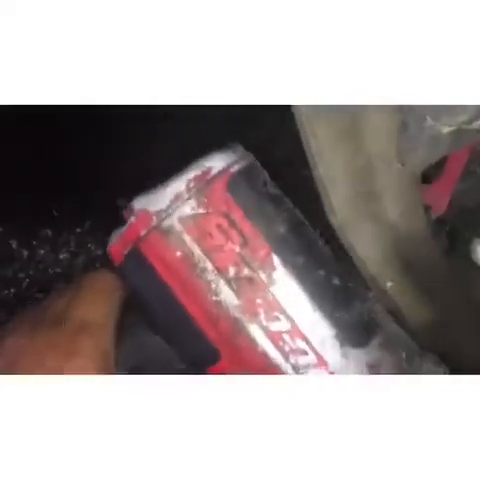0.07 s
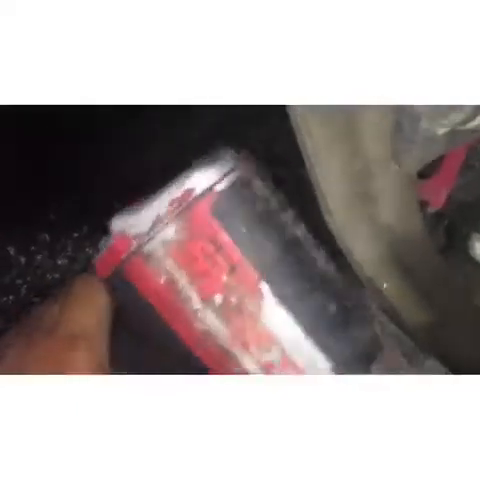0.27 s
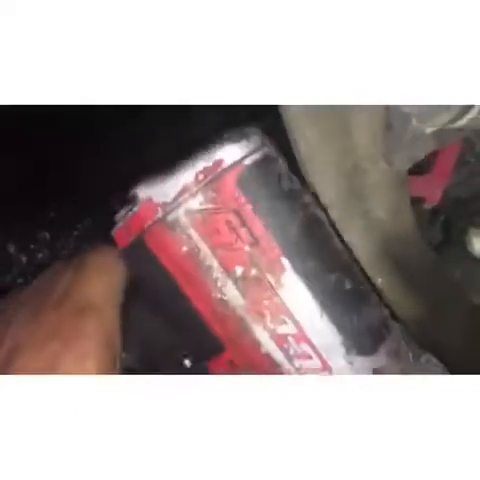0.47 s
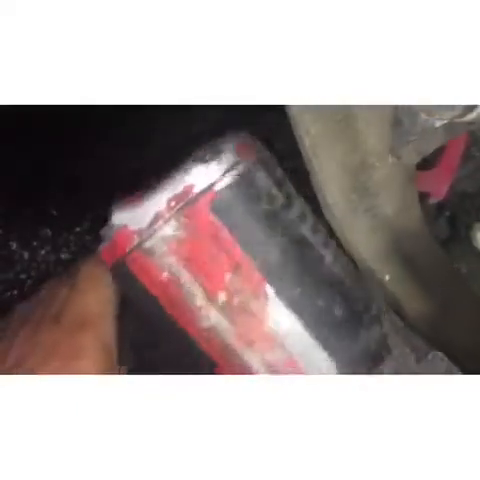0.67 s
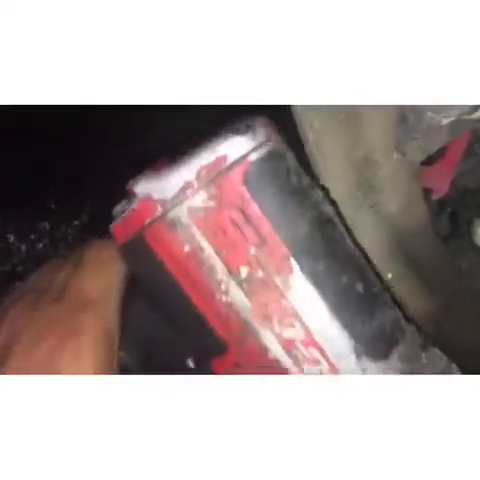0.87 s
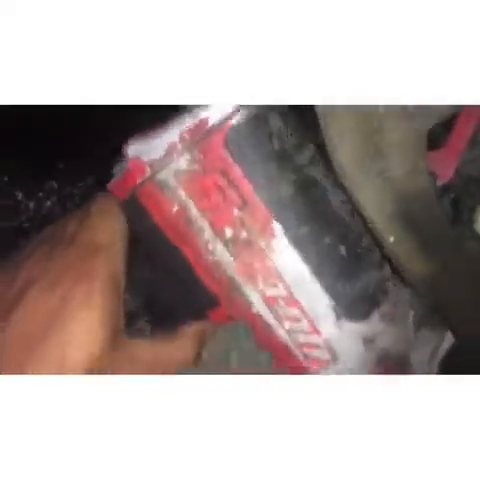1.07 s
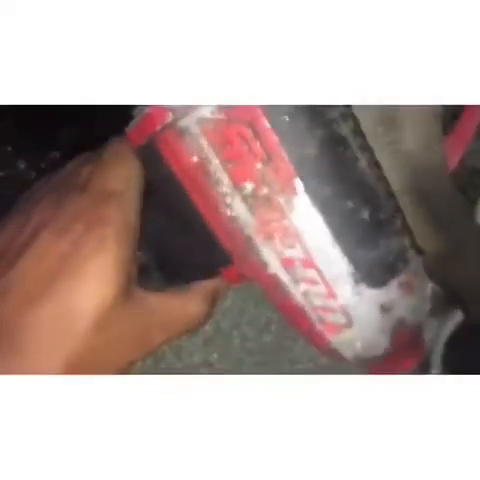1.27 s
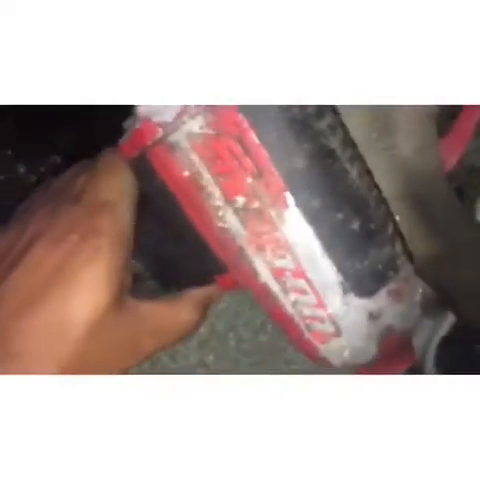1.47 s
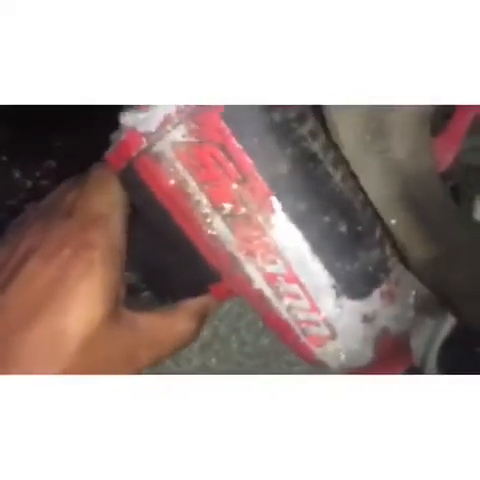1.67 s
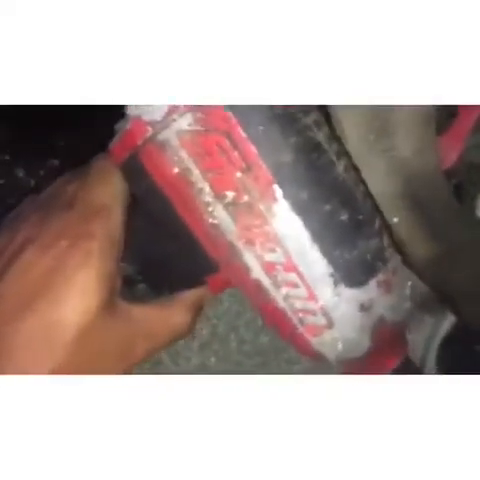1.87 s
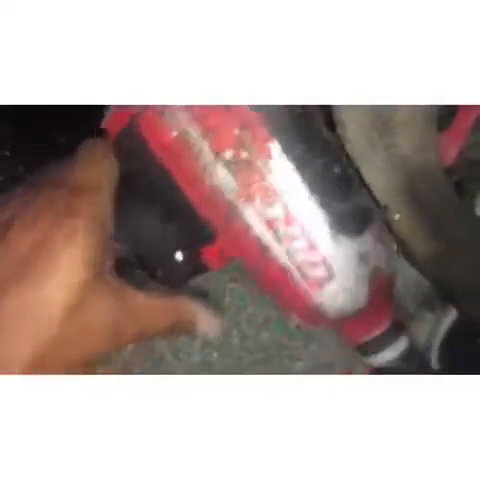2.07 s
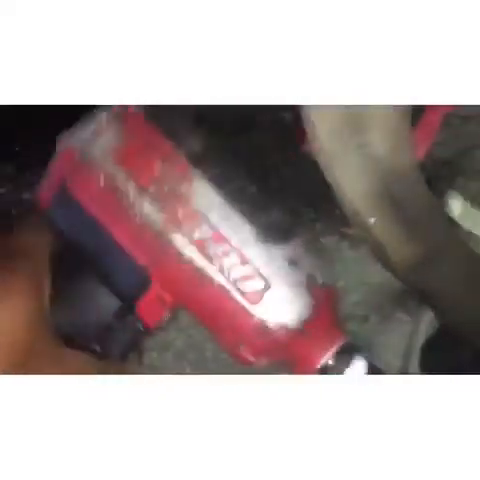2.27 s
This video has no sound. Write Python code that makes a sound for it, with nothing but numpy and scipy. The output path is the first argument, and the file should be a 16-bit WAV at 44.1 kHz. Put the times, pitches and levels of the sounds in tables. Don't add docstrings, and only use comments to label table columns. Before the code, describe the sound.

Close, harsh impact wrench rattle: two quick bursts, a long hammering run, then a brief spin-down.

```python
import sys
import numpy as np
from scipy import signal
from scipy.fft import rfft, irfft
from scipy.io import wavfile
from scipy.ndimage import uniform_filter1d

SR = 44100
rng = np.random.default_rng(int(sys.argv[2]) if len(sys.argv) > 2 else 0)


def inscribe(sig):
    pcm = np.round(np.clip(np.atleast_2d(sig).T, -1, 1) * 32767)
    wavfile.write(sys.argv[1], SR, pcm.astype(np.int16))


def volts(x):
    e = np.asarray(x, float) / 20
    return 10 ** e


N = 101429

# (frequency [Hz], level [dB])
HUM = [(46, -44), (107, -33), (154, -42), (208, -50), (305, -57)]
# (frequency [Hz], level [dB])
RUMBLE = [(18, -40), (30, -11), (123, -6.5), (430, -41), (1030, -37.5), (1780, -46), (7000, -74),
          (11700, -102), (19800, -120)]
RUMBLE_DB = -37.5
# (time [s], level [dB])
DUCK = [(.18, -2.5), (.23, -12), (.6, -24.5), (1.0, -31), (2.3, -29)]
SHOP_T60_S, SHOP_DB, WALL_CUT_HZ = .52, -27.5, 6400

# (time [s], level [dB])
AIR = [(.148, -65), (.152, -58), (.185, -34), (.21, -22), (.41, -9.5), (.43, -27), (.46, -84), (.63, -55),
       (.645, -32.5), (.665, -16), (.825, -12.5), (.85, -51), (1.02, -55), (1.04, -17), (1.2, -15.5),
       (1.95, -12.5), (2.06, -24), (2.1, -20), (2.3, -36)]
# (frequency [Hz], level per Hz [dB])
HISS = [(100, -31), (170, -4.5), (778, -12.5), (1570, -6), (4920, -16), (9580, -19), (16000, -16.5)]
STALL_SHARE, STALL_DB, CHOKE_ABOVE_HZ = 0.64, -11, 2600

# (time [s], peak [dB], centre [Hz], sharpness [1], t60 [s])
CLANKS = [
    (0.149, -28, 6840, 1.7, 0.86),
    (0.154, -25, 770, 0.7, 0.025),
    (0.152, -29.5, 305, 7.5, 0.74),
    (0.208, -0.5, 1860, 6.1, 0.09),
    (0.23, -7.5, 1220, 1.4, 0.15),
    (0.4, -15, 1040, 2.8, 0.092),
    (1.038, -18.5, 79, 1.5, 0.22),
    (2.003, -12, 1400, 1.6, 0.16),
    (2.144, -23.5, 696, 4, 0.29),
]
# (time [s], peak [dB], centre [Hz], sharpness [1], t60 [s])
LOW_THUDS = [
    (2.154, -28.5, 152, 1.5, 0.14),
    (2.19, -35, 70, 2, .4),
    (2.255, -27.5, 260, 2.5, .1),
]
# (time [s], peak [dB], centre [Hz], sharpness [1], t60 [s])
CHINKS = [
    (1.0525, -10, 1610, 2.7, 0.027),
    (2.085, -18, 9900, 8., 0.045),
    (2.102, -29, 2200, 23, .25),
    (2.109, -26, 11500, 5., .04),
    (2.11, -32, 3520, 30., .3),
    (2.151, -27, 8600, 8., .05),
    (2.155, -36.5, 3710, 34, .3),
    (2.208, -33.5, 4050, 10., 0.11),
    (2.243, -40, 8400, 10., .04),
]
# (time [s], peak [dB], centre [Hz], sharpness [1], t60 [s])
OPENINGS = [
    (.630, -19, 6500, 1.4, 0.3),
    (1.019, -15, 7960, 0.92, 0.35),
]
OPENING_SWELL_T60_S = 0.092

# (time [s], vane pitch [Hz], level [dB])
SPIN = [
    (1.96, 405.5, -62),
    (2.0, 439.4, -36),
    (2.065, 515, -38),
    (2.085, 449, -41),
    (2.105, 387.3, -34.5),
    (2.137, 307.5, -31),
    (2.2, 309.3, -43),
    (2.26, 298.5, -47),
    (2.3, 280, -54),
]
# (multiple [1], level [dB])
SPIN_ORDERS = [(1, -3), (2, 2), (3, -9), (4, -13), (5, -15)]
SPIN_WOBBLE_DB = 2
# (time [s], level [dB])
OVERTONES = [(2.07, -16), (2.088, 3), (2.125, 2), (2.15, -14)]

# (frequency [Hz], level [dB], t60 [s])
RING = [
    [(1140, 0, .8), (1384, -10, .8), (1709, -7, .7), (1986, -7, .6), (2546, -15, .5), (690, -8, .5),
     (4357, -6, .9)],
    [(673, -12, .3), (835, -12, .4), (1141, 0, .8), (1384, -13, 1.5), (1561, -13, .35), (1890, -18, .43),
     (2546, -15, .65), (4355, -19, .56)],
]
RING_DB = [-41, -37]
BOLT_SHIFT_S, LOOSE_S, LOOSE_DB = .63, 1.97, -9
# (frequency [Hz], level [dB], t60 [s])
SOCKET = [(834, -6, .1), (1140, -3, .12), (1249, -5, .1), (1389, -4, .12), (1580, -3, .09), (2030, -4, .1),
          (2213, -5, .1), (2520, -8, .12), (3130, -6, .09), (3540, -6, .12), (3700, -12, .12),
          (4010, -10, .12), (4360, -6, .12), (5780, -8, .1)]
SOCKET_DB, SOCKET_SCATTER_DB = -26, 4

# (time [s], crack peak [dB], thump [dB], mid-turn rattle [dB])
BURST_1 = [
    (0.2052, -5.5, -31, -1.5),
    (0.2388, -15.5, -27, 5),
    (0.2652, -11.5, -17, 4),
    (0.2868, -2.5, -16.5, -1.5),
    (0.3132, -1.5, -16.5, -7),
    (0.338, 0, -9.5, -4.5),
    (0.3684, -12, -12, -3),
    (0.3986, -9, -16.5, -12),
]
BURST_2 = [
    (0.6685, -7, -31, -4),
    (0.6889, -5, -18.5, 1),
    (0.72, -5, -17.5, -3),
    (0.7521, -5, -20.5, -3),
    (0.7841, -2.5, -14, -8.5),
    (0.815, -5, -20, -23),
]
LONG_RUN = [(1.0861, -1, -12.5, -5.5), (1.1146, -9, -15, 1), (1.1484, -5.5, -20.5, -3),
            (1.1806, -3, -16, -7.5), (1.2146, -3.5, -18, -3.5), (1.2502, -5, -22.5, -9),
            (1.2851, -4.5, -20, -9), (1.3206, -5.5, -20, -7.5), (1.3575, -5.5, -19, -6),
            (1.3963, -6, -19, -4), (1.434, -5.5, -17.5, -5), (1.474, -6, -17.5, -6), (1.512, -6, -18, -5),
            (1.5493, -6, -18, -2), (1.5899, -2.5, -17.5, -16.5), (1.6262, -4.5, -14, -9),
            (1.6636, -3.5, -16.5, -8.5), (1.7, -3.5, -28, -6.5), (1.7378, -2.5, -18, -7.5),
            (1.777, -5.5, -17, -4.5), (1.8129, -5, -14, -5.5), (1.8469, -5.5, -16.5, -1),
            (1.8787, -7, -18, -2.5), (1.9119, -6, -14, -6), (1.9469, -5, -13.5, -9), (1.9842, -7, -27, -13),
            (2.041, -7, -22.5, -12.5)]
# (delay [s], squareness [0-1])
LANDING = [(-0.0, 0.0), (0.0013, 1.0), (-0.001, 0.4), (-0.0012, 0.2), (-0.0012, 0.0), (0.0006, 0.3),
           (0.0003, 0.6), (0.0007, 0.0), (0.0022, 0.6), (0.0002, 0.8), (0.0003, 0.0), (0.0011, 0.1),
           (0.0003, 0.2), (0.0029, 1.0), (-0.0007, 0.0), (0.0003, 1.0), (-0.0, 0.0), (0.0011, 0.7),
           (0.0002, 0.6), (0.0005, 0.2), (0.001, 0.6), (0.0003, 0.0), (0.001, 1.0), (0.001, 0.3),
           (0.0005, 0.2), (0.0012, 0.3), (0.0012, 0.5), (0.0017, 1.0), (-0.0012, 0.0), (0.0007, 0.6),
           (0.0016, 0.6), (0.0014, 0.5), (0.0006, 0.8), (-0.0008, 0.0), (0.0009, 1.0), (0.0012, 0.0),
           (0.0016, 1.0), (0.0002, 0.0), (0.0006, 1.0), (0.0004, 0.3), (0.0008, 0.9)]
REBOUND_THUMP_DB = [-8, -16, -26]
THUMP_T60_S, THUMP_DB, THUMP_CUT_HZ = 0.076, 8, 46
THUMP_START_S, THUMP_SWINGS_PER_OCTAVE = .0011, .44
GLANCE_START_S, GLANCE_SWINGS_PER_OCTAVE = .002, .7
KNOCK_HZ, KNOCK_T60_S, KNOCK_DB = 520, .014, -5

# (time [s], peak [dB])
KNOCKS = [(0.1899, -25.5), (0.4421, -6.5), (0.6428, -26), (0.6568, -15), (1.032, -24), (1.0395, -23),
          (1.9727, -16), (1.0545, -13), (1.0715, -1.5), (2.0251, -11.5), (2.0858, -17), (2.002, -14)]
# (time [s], peak [dB])
FAINT_TICKS = [
    (0.098, -62),
    (0.534, -57),
    (2.152, -34),
    (2.209, -39),
]
# (delay [s], level [dB])
BOUNCES = [(.002, -16.5), (.0066, -9.5), (.011, -23.5)]
# (share of the turn [1], level [dB])
RATTLE = [(.45, -6.5), (.55, -7), (.65, -8.5)]
# (frequency [Hz], level per Hz [dB])
STEEL = [(180, -38.5), (300, 4.5), (787, 4), (1580, 4.5), (1840, 0.5), (4230, -3), (4910, -5), (9550, -6),
         (16000, -9)]
# (frequency [Hz], width [Hz], level [dB])
BODY = [(1240, 42, -3), (4190, 340, 7.5), (5960, 2150, 12.5), (8490, 600, 15), (9450, 650, 15.5),
        (11550, 1550, 7.5)]
BODY_DB = -12
CONTACT_LAG_S, TURN_MAX_S = .0012, .04
SNAP_T60_S, SNAP_DB = 0.005, -4
CRACK_T60_S, RATTLE_T60_S, CRACK_DB = 0.026, 0.039, -5.5
PATCH_EDGES_HZ = [500, 900, 1600, 2800, 5000, 8000]
PATCH_DB = 3
LIMIT_PEAK, CUTOFF_HZ = .56, 16400


def rms_one(x):
    return x / np.sqrt(np.mean(x ** 2) + 1e-20)


def in_time(rows):
    s, *columns = np.transpose(rows)
    return [np.interp(np.arange(N) / SR, s, c) for c in columns]


def drift(rate_hz):
    r = np.exp(-2 * np.pi * rate_hz / SR)
    return rms_one(signal.lfilter([1], [1, -2 * r, r * r], rng.standard_normal(N + SR))[SR:])


def colour(x, points):
    hz = np.maximum(np.fft.rfftfreq(4096, 1 / SR), 10)
    table_hz, table_db = np.transpose(points)
    level_db = np.interp(np.log(hz), np.log(table_hz), table_db)
    cepstrum = irfft(np.log(volts(level_db)))
    cepstrum[1:2048] *= 2
    cepstrum[2049:] = 0
    shape = irfft(np.exp(rfft(cepstrum)))
    return signal.fftconvolve(x, shape / np.sqrt(np.sum(shape ** 2)))[:len(x)]


def train(s, gain):
    out = np.zeros(N + SR)
    np.add.at(out, (np.asarray(s) * SR).astype(int), gain)
    return out[:N] + 1e-18


def dying(clicks, t60):
    return signal.lfilter([1], [1, -volts(-60 / (t60 * SR))], clicks)


def butter(x, hz, kind="low"):
    return signal.sosfilt(signal.butter(2, hz, kind, fs=SR, output="sos"), x)


def lows_of(x, hz):
    return signal.sosfiltfilt(signal.butter(2, hz, fs=SR, output="sos"), x)


def housing(x):
    out = x.copy()
    for hz, width, level_db in BODY:
        r = np.exp(-np.pi * max(width, 30) / SR)
        poles = [1, -2 * r * np.cos(2 * np.pi * hz / SR), r * r]
        out += volts(BODY_DB + level_db) * signal.lfilter([(1 - r * r) / 2, 0, (r * r - 1) / 2], poles, x)
    return rms_one(out) * np.std(x)


def blows():
    s, crack_db, thump_db, rattle_db = np.vstack([BURST_1, BURST_2, LONG_RUN]).T
    turn = np.minimum(np.diff(s, append=s[-1] + 1), TURN_MAX_S)
    return s + CONTACT_LAG_S, crack_db, thump_db, rattle_db, turn


def background():
    t = np.arange(N) / SR
    hum = np.zeros(N)
    for hz, db in HUM:
        hum += volts(db + 3 + drift(15)) * np.sin(2 * np.pi * (hz * t + rng.random()))
    rumble = volts(RUMBLE_DB) * colour(rng.standard_normal(N), RUMBLE)
    return volts(in_time(DUCK)[0]) * (hum + rumble)


def shop(x):
    t = np.arange(SR) / SR
    noise = rng.standard_normal(SR)
    slow = butter(noise, [600, WALL_CUT_HZ], "band") * volts(-60 * t / SHOP_T60_S)
    fast = .5 * noise * volts(-120 * t / SHOP_T60_S)
    tail = (slow + fast) * (t > .008)
    return volts(SHOP_DB) * signal.fftconvolve(x, tail / np.sqrt(np.sum(tail ** 2)))[:N]


def air():
    s, *_, turn = blows()
    s, turn = s[:-1], turn[:-1]
    stall = np.cumsum(train(s + STALL_SHARE * turn, 0.98) - train(s + turn, 0.9283))
    choke = volts(STALL_DB * uniform_filter1d(stall, size=90))
    hiss = housing(colour(rng.standard_normal(N), HISS))
    low = lows_of(hiss, CHOKE_ABOVE_HZ)
    flow = volts(in_time(AIR)[0] + 2.87 * drift(104))
    return flow * (np.sqrt(choke) * low + choke * (hiss - low))


def clanks():
    out = np.zeros(N)
    for row in CLANKS + LOW_THUDS + CHINKS + OPENINGS:
        s, db, hz, q, t60 = row
        click = train([s], volts(db - 11.5))
        shape = dying(click, t60)
        if row in OPENINGS:
            shape = shape - dying(click, OPENING_SWELL_T60_S)
        band = [hz / (1 + .5 / q), hz * (1 + .5 / q)]
        out += rms_one(butter(rng.standard_normal(N), band, "band")) * shape
    return out


def spin():
    hz, db = in_time(SPIN)
    phase = 2 * np.pi * np.cumsum(hz * (1 + .015 * drift(100))) / SR
    rasp_db = in_time(OVERTONES)[0]
    whine = np.zeros(N)
    for k, level_db in SPIN_ORDERS:
        order_db = level_db + (k > 1) * rasp_db + SPIN_WOBBLE_DB * drift(45)
        whine += volts(order_db) * np.sin(k * phase)
    return volts(db) * (np.arange(N) > SPIN[0][0] * SR) * whine


def ringing():
    s = np.sort(np.append(blows()[0], KNOCKS[1][0]))
    t = np.arange(N) / SR
    last = np.searchsorted(s, t) - 1
    since, out = t - s[last], np.zeros(N)
    for modes, ring_db, held in zip(RING, RING_DB, (s < BOLT_SHIFT_S, s >= BOLT_SHIFT_S)):
        for hz, level_db, t60 in modes:
            phase = 2 * np.pi * (hz * since + rng.random(len(s))[last] + .01 * drift(20))
            fade = volts(ring_db + level_db - 60 * since / np.clip(t60, .15, 2.5))
            out += held[last] * fade * np.sin(phase)
    return out * (last >= 0) * volts(LOOSE_DB * (t > LOOSE_S))


def socket():
    s, db = np.append(blows()[:2], np.transpose(KNOCKS), axis=1)
    luck, out = rng.standard_normal((len(s), 2, len(SOCKET))), np.zeros(N)
    for k, (hz, level_db, t60) in enumerate(SOCKET):
        r, w = volts(-60 / (t60 * SR)), 2 * np.pi * hz / SR
        strength = volts(db + level_db + SOCKET_SCATTER_DB * luck[:, 1, k])
        clicks = train(s, np.sign(luck[:, 0, k]) * strength)
        out += signal.lfilter([0, np.sin(w)], [1, -2 * r * np.cos(w), r * r], clicks)
    return volts(SOCKET_DB) * out


def sweep(start, swings):
    t = np.arange(SR // 10) / SR
    return -np.sin(2 * np.pi * swings * np.log2(1 + t / start)) * volts(-60 * t / THUMP_T60_S)


def thumps():
    s, _, db, _, turn = blows()
    t = np.arange(SR // 10) / SR
    note = -np.sin(2 * np.pi * KNOCK_HZ * t) * volts(KNOCK_DB - 60 * t / KNOCK_T60_S)
    crisp = sweep(THUMP_START_S, THUMP_SWINGS_PER_OCTAVE) + note
    soft = sweep(GLANCE_START_S, GLANCE_SWINGS_PER_OCTAVE)
    lag, square = np.transpose(LANDING)
    rebound_db = np.repeat(REBOUND_THUMP_DB, [len(BURST_1), len(BURST_2), len(LONG_RUN)])
    rebound = train(s + turn / 2, volts(db + rebound_db))
    glancing = uniform_filter1d(rebound + train(s + lag, (1 - square) * volts(db)), size=70)
    squarely = train(s + lag, square * volts(db))
    out = signal.fftconvolve(squarely, crisp) + signal.fftconvolve(glancing, soft)
    return volts(THUMP_DB) * butter(out[:N], THUMP_CUT_HZ, "high")


def cracks():
    s, db, _, rattle_db, turn = blows()
    luck = rng.standard_normal((len(s), 12))
    first = train(s, volts(db))
    for when, peak_db in KNOCKS + FAINT_TICKS:
        first = first + train([when], volts(peak_db))
    sharp = first
    for k, (lag, level_db) in enumerate(BOUNCES):
        bounce_db = db + level_db + 1.5 * luck[:, k + 3]
        sharp = sharp + train(s + lag * (1 + .1 * luck[:, k]), volts(bounce_db))
    soft = np.zeros(N)
    for k, (share, level_db) in enumerate(RATTLE):
        contact_db = db + rattle_db + level_db + 0.74 * luck[:, k + 9]
        soft += train(s + turn * (share + 0.033 * luck[:, k + 6]), volts(contact_db))
    shape = volts(SNAP_DB) * dying(first, SNAP_T60_S) + dying(sharp, CRACK_T60_S) + dying(soft, RATTLE_T60_S)
    shape = signal.fftconvolve(shape, np.full(40, 1 / 40))[:N]
    grit = rms_one(rng.standard_normal(N) * volts(2.5 * drift(900)))
    return volts(CRACK_DB) * housing(colour(grit * shape, STEEL))


def patchy(x):
    lows = [0 * x] + [lows_of(x, hz) for hz in PATCH_EDGES_HZ] + [x]
    out = np.zeros(N)
    for low, high in zip(lows, lows[1:]):
        out += (high - low) * volts(PATCH_DB * drift(40) - 1)
    return out


def scene():
    tool = patchy(cracks()) + socket() + clanks() + thumps() + air() + spin()
    return (tool + ringing() + shop(tool) + background())[None]


def roll_off(x):
    return signal.sosfilt(signal.butter(12, 16800, fs=SR, output="sos"), x)


def record(dry):
    top = signal.cheby2(12, 70, CUTOFF_HZ + 300, fs=SR, output="sos")
    x = signal.sosfilt(top, dry)
    limited = x / (1 + (x / LIMIT_PEAK) ** 4) ** .25
    mix = signal.sosfilt(top, limited)
    return roll_off(mix)


dry = scene()
out = record(dry)
inscribe(out)
```